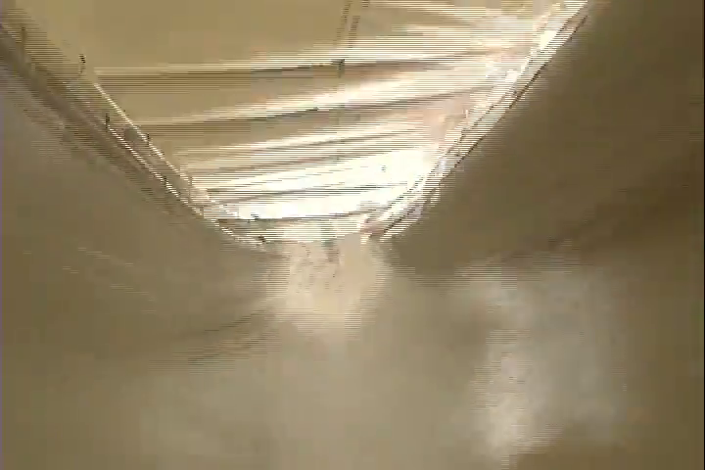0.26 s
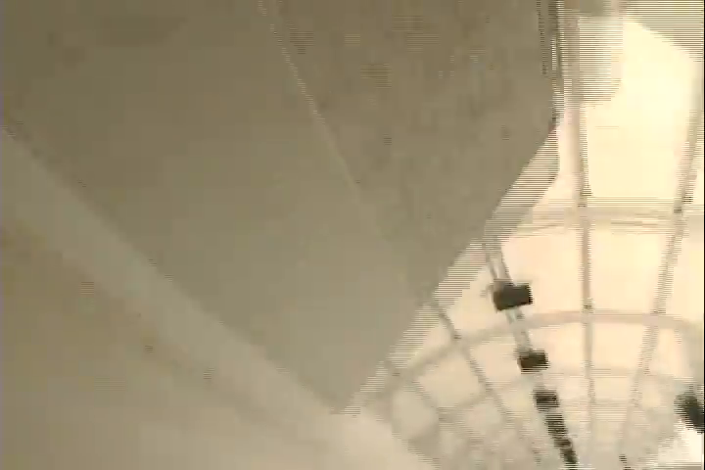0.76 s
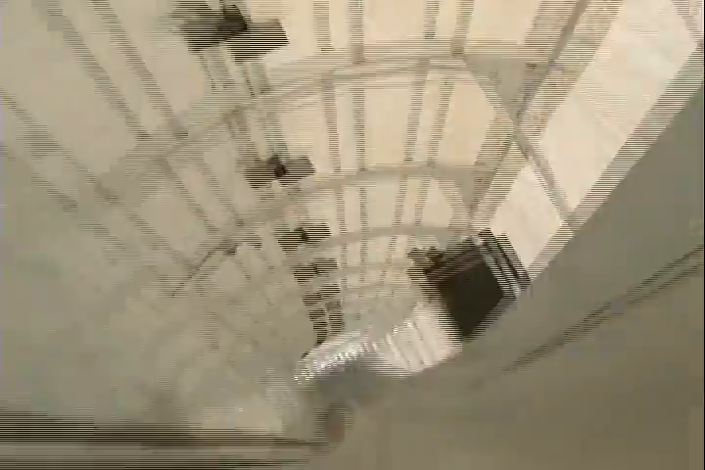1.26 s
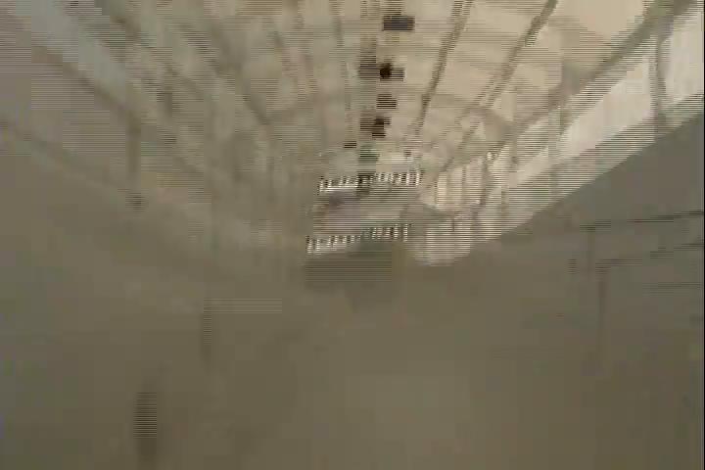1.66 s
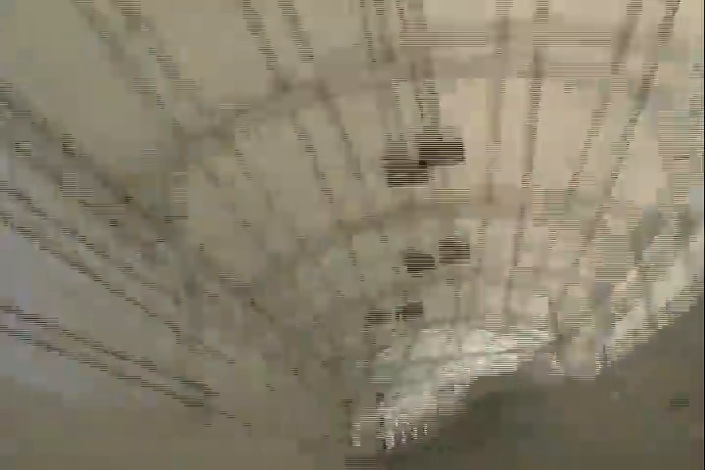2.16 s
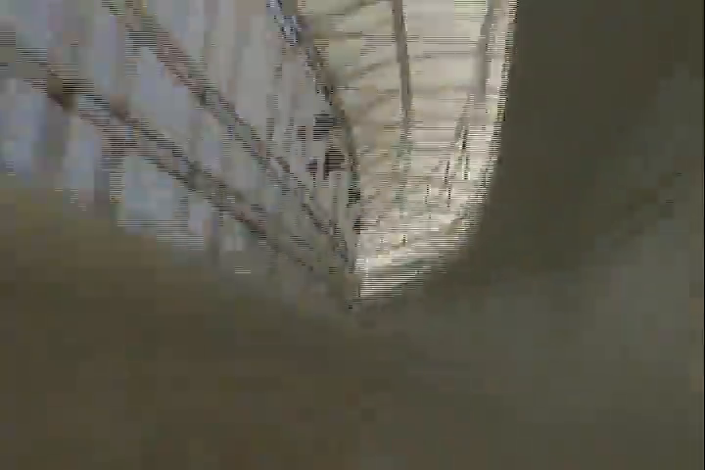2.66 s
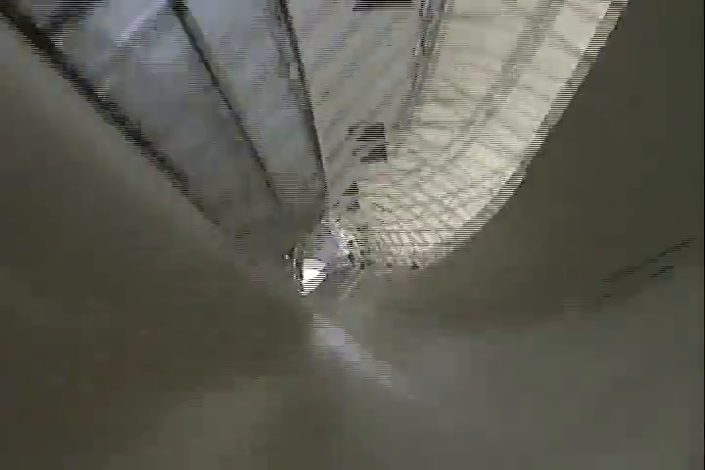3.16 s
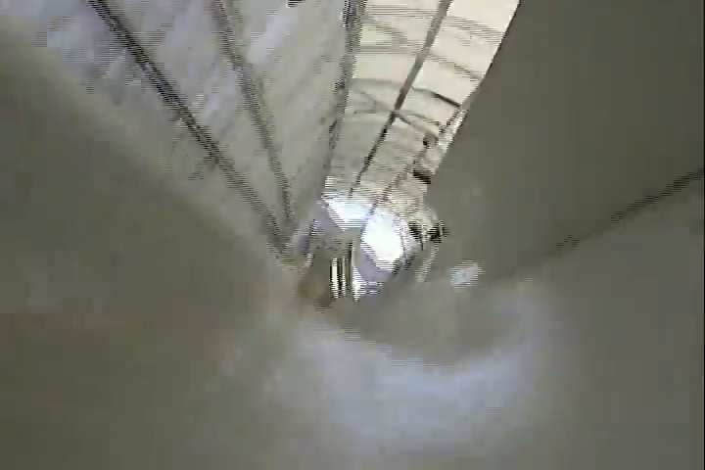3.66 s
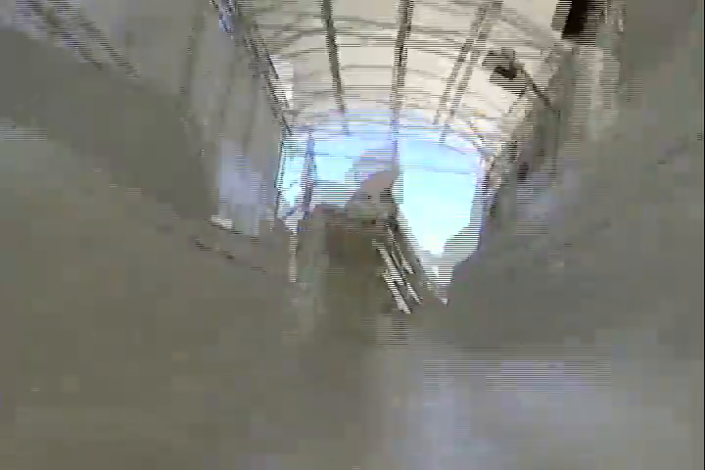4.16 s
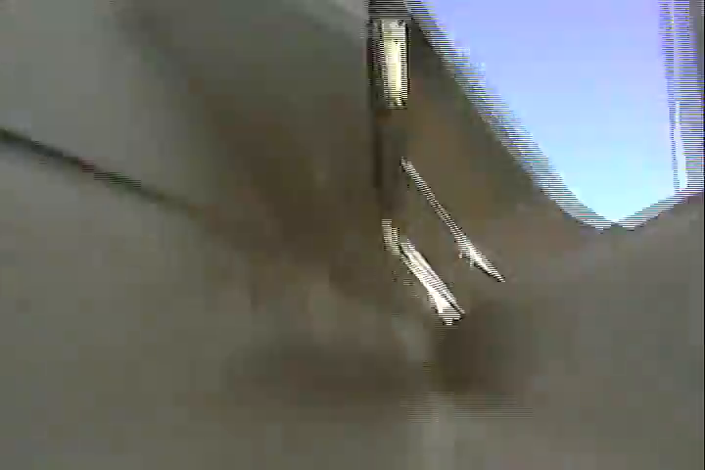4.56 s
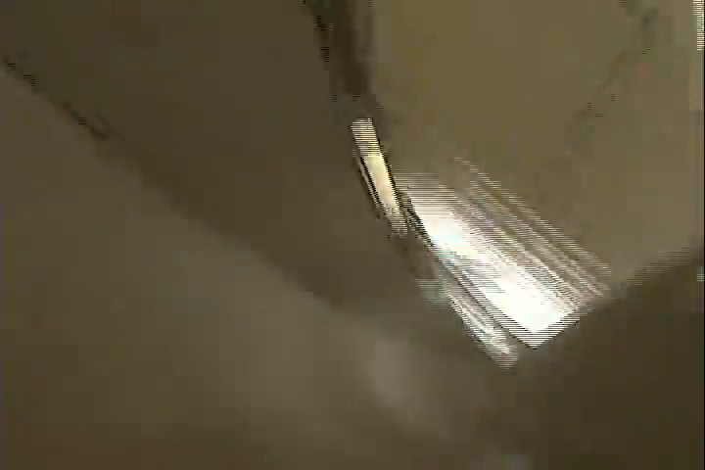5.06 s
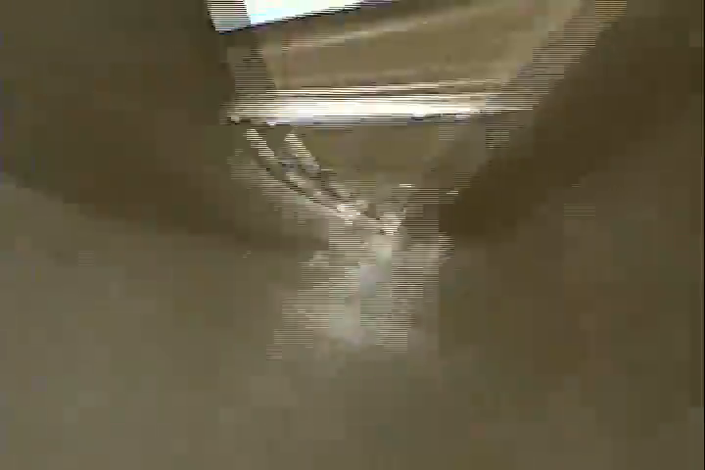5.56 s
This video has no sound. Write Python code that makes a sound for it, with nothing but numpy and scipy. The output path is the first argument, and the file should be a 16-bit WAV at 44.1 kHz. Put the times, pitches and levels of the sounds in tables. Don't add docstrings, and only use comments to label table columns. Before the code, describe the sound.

Close onboard roar of a fast ice sled: low thuds, scraping steel, knocks over bumps, gusty wind and a brief harsh skid early on.

```python
import sys
import numpy as np
from scipy import signal
from scipy.fft import rfft, irfft, next_fast_len
from scipy.io import wavfile
from scipy.ndimage import uniform_filter1d

SR = 44100
rng = np.random.default_rng(int(sys.argv[2]) if len(sys.argv) > 2 else 0)


def to_wav(s):
    ch = np.atleast_2d(s).T
    pcm = np.round(np.clip(ch, -1, 1) * 32767)
    wavfile.write(sys.argv[1], SR, pcm.astype(np.int16))


def invert_db(x):
    u = np.asarray(x, float) / 20
    return 10 ** u


N = 256650
SIZE = next_fast_len(N)
HZ = np.maximum(np.arange(SIZE // 2 + 1) * SR / SIZE, 1)


def unit(x):
    return x / np.sqrt(np.mean(x ** 2))


def to_sound(spectrum):
    return irfft(spectrum, SIZE)[..., :N]


def over_time(table):
    s, *columns = np.transpose(table)
    return [np.interp(np.arange(N) / SR, s, column) for column in columns]


def over_hz(table):
    hz, *columns = np.transpose(table)
    return [np.interp(np.log(HZ), np.log(hz), column) for column in columns]


def swells(times, lengths, db):
    t = np.arange(0, N, 64) / SR
    bells = np.exp(-((t - np.c_[times]) / np.maximum(np.c_[lengths], .01)) ** 2)
    return np.interp(np.arange(N) / SR, t, db @ bells)


def walk(rate):
    hold = int(SR / rate)
    steps = np.repeat(rng.standard_normal(N // hold + 1), hold)
    return unit(uniform_filter1d(uniform_filter1d(steps, hold), hold)[:N])


def resonance(hz, width):
    return 1 / (1 + 1j * (HZ - hz ** 2 / HZ) / width)


def grit(per_s, spread_db, share):
    sizes = np.minimum(rng.exponential(size=(3, N)), 3.5)
    chips = (rng.random((3, N)) < per_s / SR) * invert_db(spread_db * sizes)
    slide = rng.standard_normal((3, N))
    return rfft(slide + share * unit(chips * np.sign(slide)), SIZE)


def at_ports(streams, ports):
    likeness, lead, pan_db = over_hz(ports)
    paths = np.array([np.ones_like(lead), np.exp(1j * lead)])
    shared = np.sqrt(likeness) * streams[0] * paths
    separate = np.sqrt(1 - likeness) * streams[1:]
    return (shared + separate) * invert_db(np.array([pan_db, -pan_db]) / 2)


# (frequency [Hz], level [dB per Hz])
WIND_COLOUR = [(20, -9), (70, 0), (220, 5.5), (430, 3), (600, -0.5), (1200, -8.5), (2500, -20), (5000, -41)]
# (time [s], length [s], level [dB])
LULLS = [
    (0.05, .1, -10),
    (1.355, 0.11, -11),
    (1.643, 0.095, -8.5),
    (2.9, 0.047, -5),
    (3.4, .05, -1),
    (3.68, .06, -2),
    (5.397, 0.055, -12),
    (5.75, .1, -9),
]
# (time [s], shaking of the frame [dB], pressure of the runners on the ice [dB])
RIDE = [(0.0, -2, -0.5), (0.25, -2, -3.5), (0.55, 1, -1.5), (0.8, -2, -4), (1.1, 1.5, -1.5), (1.5, -0.5, 1),
        (1.75, -2, -1.5), (2.05, 2, -0.7), (2.4, 4.5, -1), (2.7, 3, 2), (3.1, 1, 1), (3.45, 0.5, -1),
        (3.75, 0, 0), (4.2, 1, 0), (4.6, 0.5, -0.5), (4.9, 1.5, -1), (5.4, -0.5, -0.2), (5.82, -3, 2.5)]


def wind():
    level_db, follows_shake = -24.8, 0.49
    eddies = to_sound(rfft(rng.standard_normal((2, N)), SIZE) * invert_db(over_hz(WIND_COLOUR)[0]))
    gusts = np.array([walk(25.26), walk(24.85)])
    shake_db = over_time(RIDE)[0]
    db = level_db + follows_shake * shake_db + swells(*np.transpose(LULLS)) + 3.0 + 2.16 * gusts
    return unit(eddies) * invert_db(db)


# (frequency [Hz], likeness [0-1], right leads [rad], left minus right [dB])
PORTS = [(500, .997, 0, .5), (1000, .93, .1, .9), (1500, .7, .15, 2.5), (1800, .5, .6, 2.8),
         (2400, .55, 1.6, -.5), (2800, .5, 2.1, -.5), (3500, .55, 3.0, 4.5), (4200, .1, 4.5, 5),
         (5000, .35, 6.4, 6), (6200, .4, 10.4, 4.5), (7300, .25, 9.4, 3), (8500, .1, 9.2, 1.7),
         (11000, .1, 8, 1.8)]
# (frequency [Hz], level [dB per Hz])
STEEL = [(110, 3), (180, -4), (303, -2.5), (400, -5.5), (801, -11.5), (1910, -24), (2350, -22.5),
         (3820, -30), (4870, -33.5), (7390, -43.5), (10300, -47.5), (11400, -52.5), (14800, -90),
         (22000, -120)]
# (time [s], peak above 1.5 kHz [dB], knock below it relative [dB], length [s])
BUMPS = [(0.101, -11, 8, 0.0072), (0.215, -18.5, 15, 0.023), (0.55, -16, 15, 0.0067),
         (0.599, -25, 25, 0.011), (0.615, -23, 22.5, 0.012), (0.765, -20, 0, 0.0079),
         (0.852, -7.5, 15, 0.0079), (0.93, -17.5, -3, 0.028), (1.2484, -8, -2, 0.018),
         (1.671, -3.5, 5, 0.013), (1.73, -13, -23, 0.013), (2.158, -11.5, 19, 0.0061),
         (2.307, -9, 17, 0.012), (2.35, -13, 12, 0.018), (2.413, -10, 12, 0.011), (2.525, -15, -6, 0.0058),
         (2.876, -10, 10, 0.0089), (3.055, -12.5, 16, 0.02), (3.1283, -25, 1, 0.0058),
         (3.166, -18, 7, 0.0072), (3.633, -15, 20, 0.012), (4.002, -18, 13, 0.011), (4.347, -15, 20, 0.012),
         (4.495, -17, 13, 0.01), (4.6693, -30, 1, 0.0092), (4.93, -18, -5, 0.014), (5.122, -15, 12, 0.01),
         (5.437, -14, 18.5, 0.0091), (5.517, -15, 2, 0.01)]


def bumps():
    contact = at_ports(grit(per_s=1500, spread_db=8.0, share=0.8), PORTS) * invert_db(over_hz(STEEL)[0])
    below = 1 / (1 + (HZ / 1500) ** 4)
    no_rumble = 1 / (1 + (450 / HZ) ** 4)
    knock = unit(to_sound(contact * below * no_rumble))
    scrape = unit(to_sound(contact * (1 - below)))
    out = np.zeros((2, N))
    for s, db, knock_db, length in BUMPS:
        near = slice(int(s * SR), int((s + .12) * SR))
        age = np.arange(N)[near] / SR - s
        shape = (1 - np.exp(-age / .003)) * np.exp(-age / max(length, .002))
        hit = scrape[:, near] + invert_db(knock_db - 1) * knock[:, near]
        out[:, near] += invert_db(db - 12) * shape * hit
    return out


def ringing(modes):
    response = 0
    for k, (hz, width, db) in enumerate(modes):
        response = response + invert_db(db) * resonance(hz, width) ** 2 * (-1) ** k
    return response


# (start [s], length [s], groan [dB], squeal [dB], spray [dB])
GRABS = [
    (1.215, 0.027, -16.5, -23, -29),
    (1.243, .02, -9.5, -24, -32),
    (1.264, 0.026, -10, -17, -28),
    (1.289, 0.061, -9.5, -12, -22),
    (1.355, .02, -11, -15.5, -24.5),
    (1.382, 0.027, -18, -38, -38),
    (1.428, 0.034, -17, -33, -30.5),
]


def grip():
    rise_s, fall_s = 0.0066, .006
    t, out = np.arange(N) / SR, 0
    for s, length, *db in GRABS:
        rise = np.clip((t - s) / rise_s, 0, 1)
        fall = np.exp(-np.maximum(t - s - length, 0) / fall_s)
        out = np.maximum(out, np.c_[invert_db(np.array(db))] * rise * fall)
    return out


# (frequency [Hz], width [Hz], level [dB])
SKID_BODY = [(400, 200, 0), (590, 200, -1), (860, 280, -4), (1100, 250, -10)]
# (frequency [Hz], width [Hz], level [dB])
SKID_SQUEAL = [(1340, 300, -2), (1830, 200, 0), (2180, 280, 0), (2460, 240, -2)]
# (frequency [Hz], level [dB per Hz])
SPRAY = [(2000, -30), (2900, 0), (4200, -1), (5200, -6), (7000, -12), (10500, -14), (12000, -16)]
# (frequency [Hz], likeness [0-1], right leads [rad], left minus right [dB])
SKID_PORTS = [(400, .99, -.1, 0), (1000, .82, -.5, -.5), (1400, .4, .3, 1.5), (1750, .92, 1.2, 1.7),
              (2600, .9, 1.5, -4.5), (3500, .7, 3.2, 1.5), (4500, .15, 4, 3.7), (11000, .2, 9, 1)]


def skid():
    contact = at_ports(grit(per_s=1800, spread_db=4.0, share=.6), SKID_PORTS)
    colours = ringing(SKID_BODY), ringing(SKID_SQUEAL), invert_db(over_hz(SPRAY)[0])
    throb = invert_db(1.2 * walk(90))
    return throb * sum(unit(to_sound(contact * colour)) * gain for colour, gain in zip(colours, grip()))


# (time [s], thud [dB], boom [dB], drone [dB])
JOLTS = [(0.11, -3, 2.5, -2), (0.5, 7, 4, 1), (0.71, 9.5, 1, 2), (0.99, 10.5, 2.5, 0), (1.2, 1, 3, 0),
         (1.28, -8, -1.5, -1.5), (1.58, 1, 3, -5), (1.7, -8, 1.5, 5.5), (1.88, -3, 5, 1), (2.08, 15, 4, 4),
         (2.2, -9, 1.5, -10), (2.3, -6, -0.5, 1), (2.45, 8, -1, 0), (2.65, 6.5, 2.5, 0.5),
         (2.76, -3, -4.5, -4), (2.84, 9.5, 5, -3), (3.04, 7.5, -0.5, 2.5), (3.3, -6, 4, 3),
         (3.5, 0, -4, 1.5), (3.62, 4, -9, 4), (3.96, 8.5, 3.5, 3), (4.11, -3, -6, 0.5), (4.21, 5.5, 3, 4.5),
         (4.4, -4, -0.8, 4.5), (4.49, 5.5, -6, -0.5), (4.6, -2, 5.5, 2), (4.75, -10, -3.5, -1.5),
         (4.83, 9, 3.5, 1), (5.54, 6, 6, 2.5), (5.63, -11, -5, 3.5)]


def jolt_db(column):
    rows = np.transpose(JOLTS)
    return swells(rows[0], 0.044 + 0 * rows[0], rows[column])


# (time [s], length [s], grind [dB], scrape and hiss [dB])
BITES = [(0.085, 0.036, 6, -0.5), (0.31, 0.045, 3.5, 1), (0.594, 0.032, 1, 2.5), (0.9, 0.053, 7, 3),
         (0.99, 0.081, 6.5, 3.5), (1.523, 0.036, 4, 0), (1.7, 0.055, 2.5, 1.5), (1.904, 0.1, 4.5, 1.1),
         (2.155, 0.037, 6.5, 2), (2.502, 0.038, 3.5, 3), (2.615, 0.044, 1.5, 3.5), (2.88, 0.11, 3.5, 0.3),
         (3.083, 0.025, 4, 1.5), (3.288, 0.058, 3, 2.5), (3.634, 0.084, 4.5, 2.5),
         (3.807, 0.048, 4.5, -0.5), (4.197, 0.086, 3, 2), (4.396, 0.032, 0.5, 1), (4.586, .04, 1, 1),
         (4.836, .04, -4, -1.5), (5.096, 0.16, 2, 2), (5.38, 0.032, 3, 4.5), (5.58, 0.06, 0, 2),
         (5.698, .05, 0, .6), (4.005, .04, 1.5, -0.7), (2.724, .05, 0.5, .6)]
RUNNER_DB = [-16, -19, -28, -38]
FOLLOWS_SHAKE = [0.88, 0.18, .05, .05]
FOLLOWS_PRESSURE = [.1, .8, .9, 1.1]


def load():
    shake_db, pressure_db = over_time(RIDE)
    s, length, grind_db, treble_db = np.transpose(BITES)
    treble = swells(s, length, treble_db)
    events = np.array([jolt_db(column=3), swells(s, length, grind_db), treble, treble])
    ride = np.c_[FOLLOWS_SHAKE] * shake_db + np.c_[FOLLOWS_PRESSURE] * pressure_db
    return np.c_[RUNNER_DB] + ride + events


# (from [Hz], to [Hz])
RUNNER_BANDS = [(220, 500), (500, 1300), (1500, 3500), (4000, 11000)]


def runners():
    colour = invert_db(over_hz(STEEL)[0])
    sound = at_ports(grit(per_s=2500, spread_db=3.5, share=0.59), PORTS) * colour
    rest_db = [10 * np.log10(np.sum(colour[(HZ > a) & (HZ < b)] ** 2)) for a, b in RUNNER_BANDS]
    load_db = load() - np.array(rest_db)[:, None]
    centres = np.log2([330, 800, 2300, 5500])
    chatter, out = walk(40), 0
    for octave in np.arange(7.5, 14, .5):
        window = np.clip(1 - 2 * np.abs(np.log2(HZ) - octave), 0, 1)
        weights = [np.interp(octave, centres, row) for row in np.eye(len(centres))]
        sharp = np.clip((octave - 8.2) / 0.7, 0, 1)
        db = weights @ load_db + sharp * 1.22 * chatter + 1.0 * walk(20)
        out = out + to_sound(sound * window) * invert_db(db)
    return out * np.sqrt(SIZE / 2) * invert_db(-2.5)


# (frequency [Hz], level [dB per Hz])
THUD = [(8.8, -38), (15, -16.5), (118, 2.5), (200, -44), (260, -37), (440, -120)]


def frame():
    thud_db, boom_db, sway_db = -18.5, -13, -32.5
    boom_hz, boom_width_hz, sway_hz = 128, 100, 30
    shake_db = over_time(RIDE)[0]
    shake = rfft(rng.standard_normal((3, N)), SIZE)
    thud = to_sound(shake[0] * invert_db(over_hz(THUD)[0]) / (1 + (HZ / 90) ** 4))
    boom = to_sound(shake[1] * resonance(boom_hz, boom_width_hz) ** 1.636)
    sway = to_sound(shake[2] * resonance(sway_hz, sway_hz))
    thud = unit(thud) * invert_db(thud_db + shake_db + jolt_db(column=1))
    boom = unit(boom) * invert_db(boom_db + shake_db + jolt_db(column=2))
    return thud + boom + unit(sway) * invert_db(sway_db)


def scene():
    return wind() + bumps() + skid() + runners() + frame()


# (frequency [Hz], level under the sound [dB])
BLUR = [(300, -34), (1500, -16), (4000, -8), (8000, -4), (12000, -3)]


def camera_haze(x):
    framing = dict(window="cosine", nperseg=4096)
    hz, s, frames = signal.stft(x, SR, **framing)
    blur_hz, blur_db = np.transpose(BLUR)
    blur_db = np.interp(np.log(hz + 1), np.log(blur_hz), blur_db)
    phase = np.exp(2j * np.pi * rng.random(frames.shape))
    blur = uniform_filter1d(np.abs(frames), size=31, axis=1) * phase
    edge = rng.uniform(11050, 11600, size=(2, 1, len(s)))
    kept = (frames + invert_db(blur_db)[:, None] * blur) * (hz[:, None] < edge)
    return signal.istft(kept, SR, **framing)[1][:, :N]


def top_cut(x):
    return signal.sosfilt(signal.butter(12, 11640, fs=SR, output="sos"), x)


def record(dry):
    drive_db, ceiling, knee, top_hz = 0.5, .74, 9.0, 11180
    x = dry * invert_db(drive_db) / ceiling
    x = ceiling * x / (1 + np.abs(x) ** knee) ** (1 / knee)
    x = signal.sosfilt(signal.butter(8, top_hz, fs=SR, output="sos"), x)
    mix = camera_haze(x)
    return top_cut(mix)


dry = scene()
out = record(dry)
to_wav(out)
```